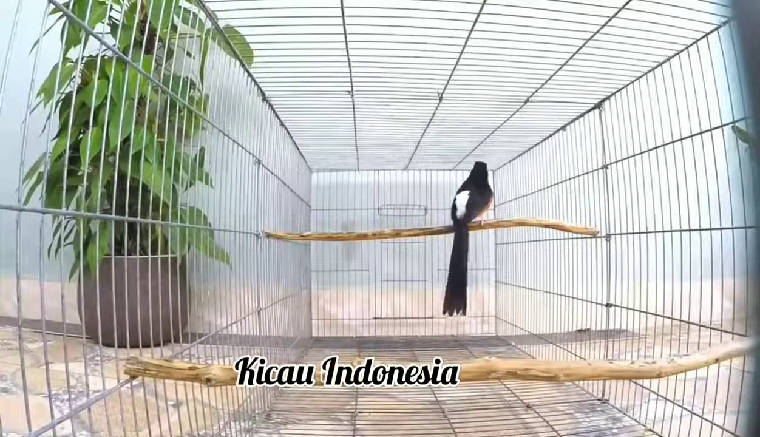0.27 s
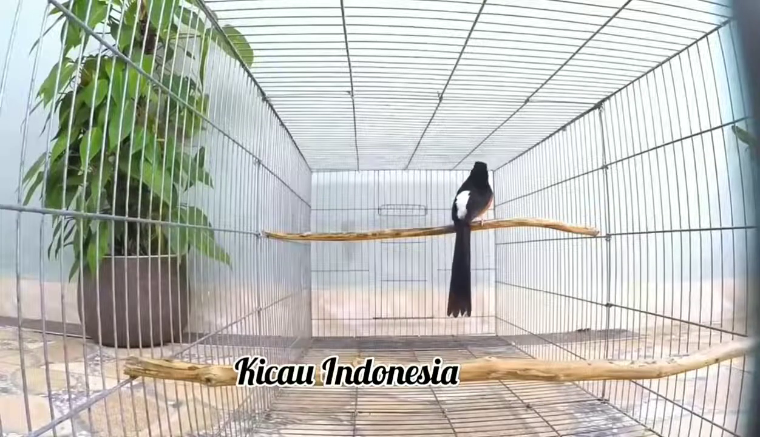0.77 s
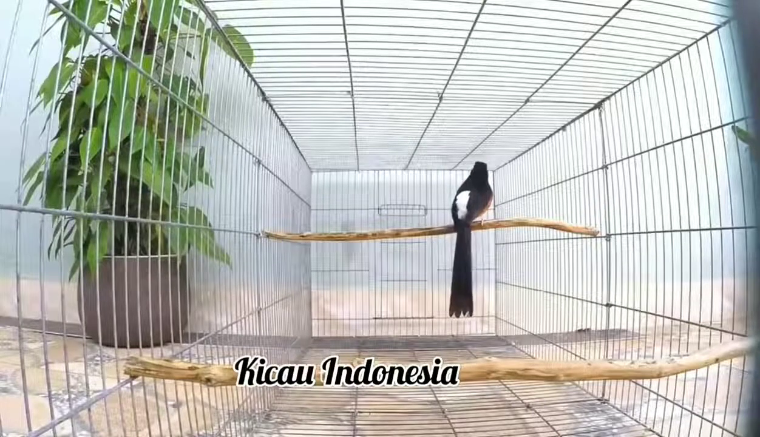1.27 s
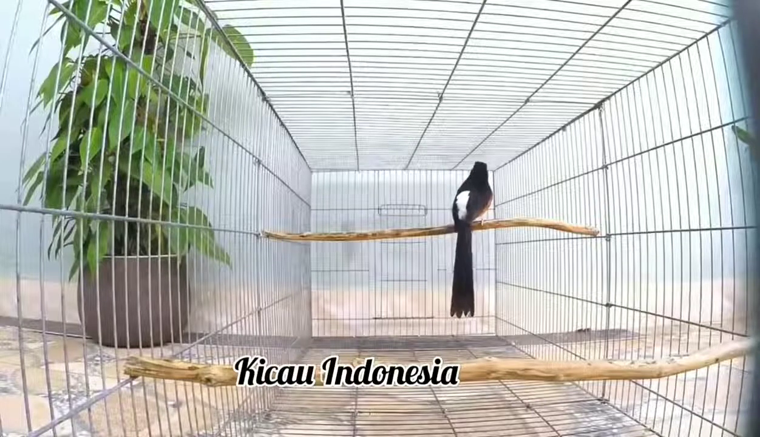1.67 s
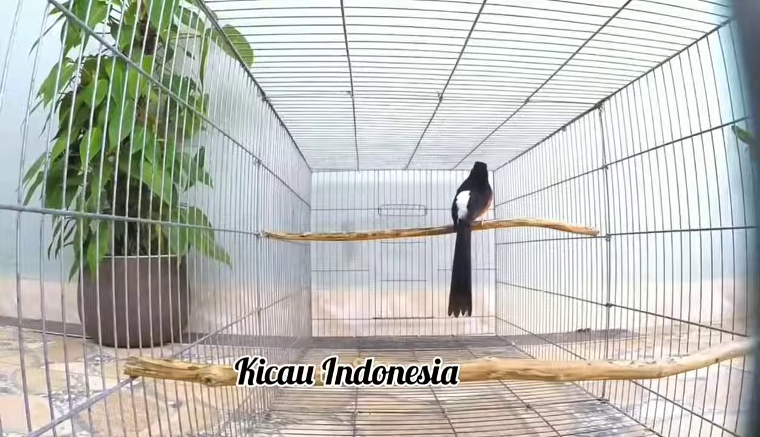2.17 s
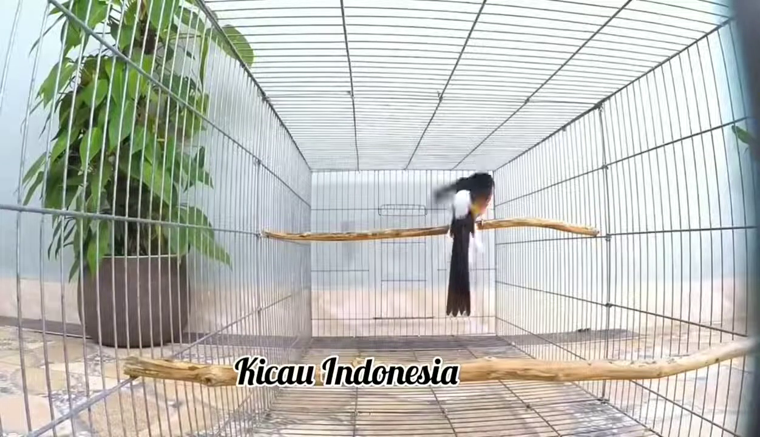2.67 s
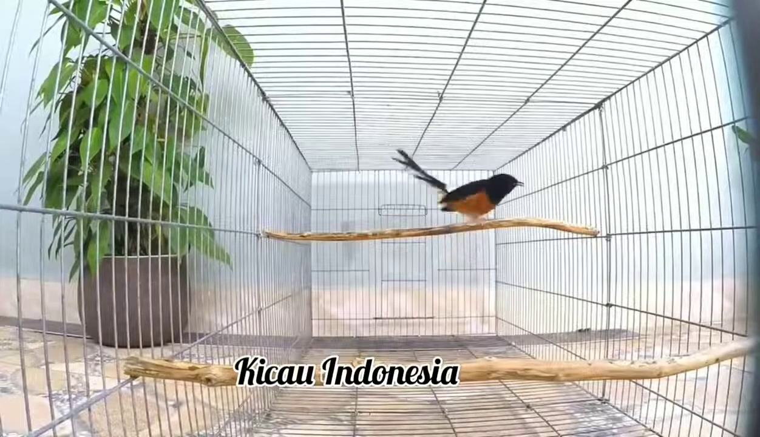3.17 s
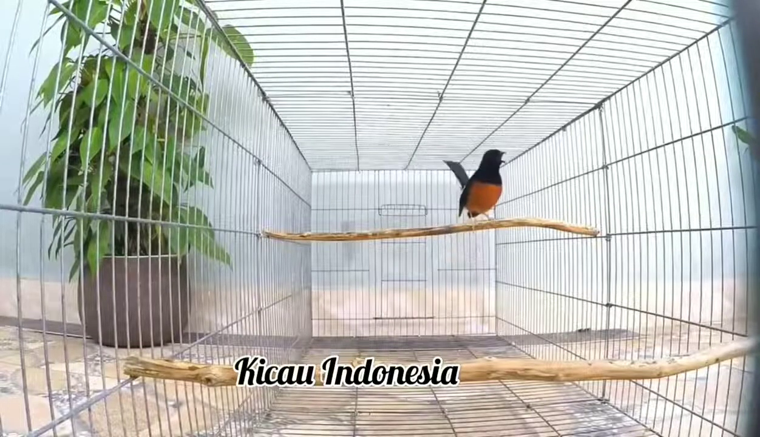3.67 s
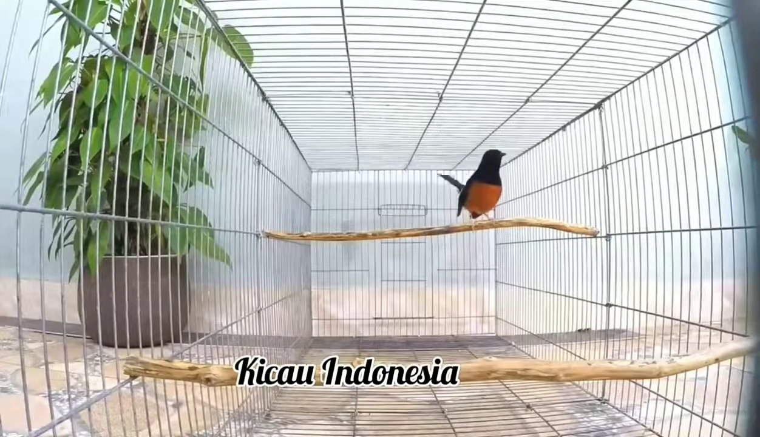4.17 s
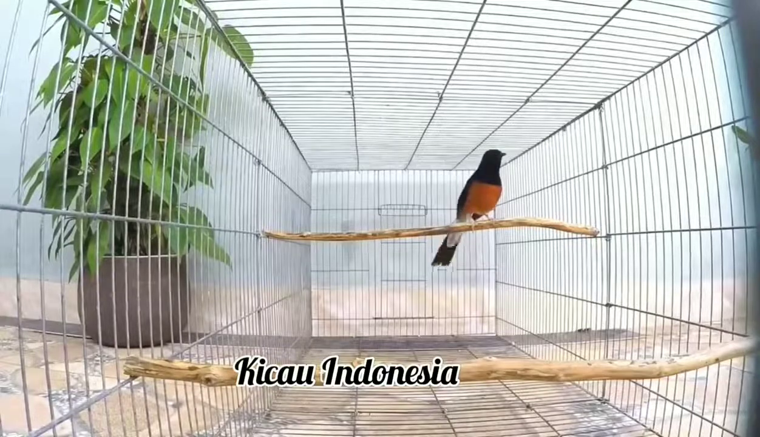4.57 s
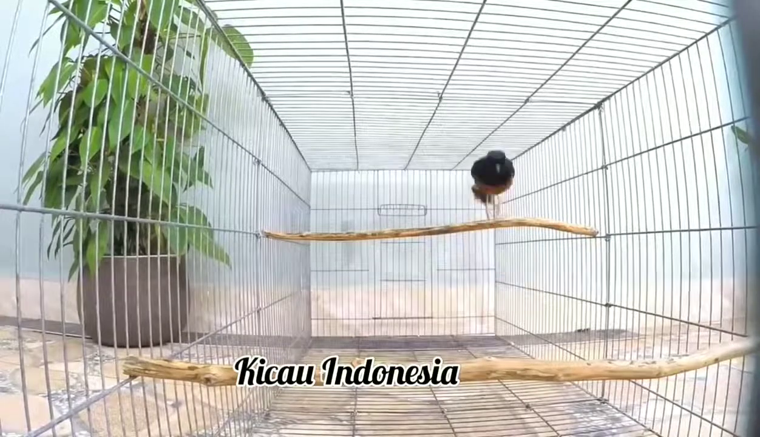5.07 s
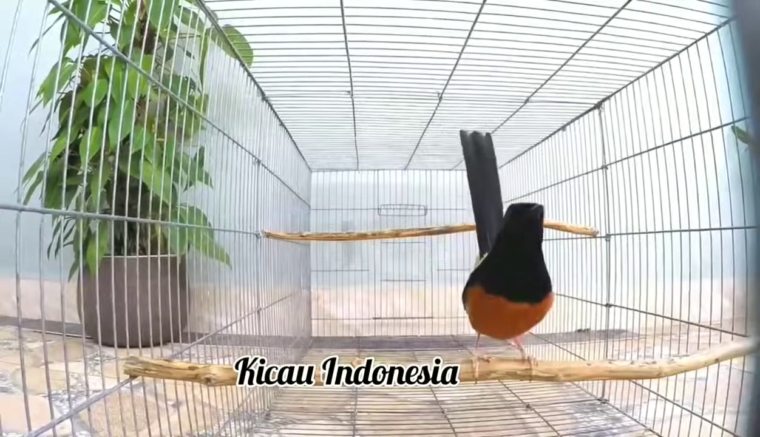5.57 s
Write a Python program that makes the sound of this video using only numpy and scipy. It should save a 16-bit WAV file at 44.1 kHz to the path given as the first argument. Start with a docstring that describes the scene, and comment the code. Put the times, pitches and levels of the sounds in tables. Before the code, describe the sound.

A songbird in a cage sings very close to the microphone in a lively room, its loudest notes slightly flattened. Two rising whistles lead to warbling churrs and low beating trills. Soft rising slurs and dry clicks follow, then a steep falling whistle, faint twitters, feather rustle, a low cage shudder on landing, a quick click rattle and a bright pipe. Distant motorbike and traffic rumble underneath.

```python
"""Rising whistles, churrs and low trills, then soft slurs, dry clicks, one steep falling whistle and a pipe.
A caged shama sings so near the microphone, in a reverberant room, that its loudest notes are flattened.
Each syllable is a gliding, warbling tone; clicks and feather rustles are shaped noise, and so is the
shudder of the cage on landing. Underneath, far off: a motorbike built from engine harmonics, noise-made
traffic, and a faint steady hiss."""
import sys
import numpy as np
from scipy import signal
from scipy.fft import rfft, irfft, next_fast_len
from scipy.io import wavfile
from scipy.ndimage import uniform_filter1d, map_coordinates

SR = 44100
rng = np.random.default_rng(int(sys.argv[2]) if len(sys.argv) > 2 else 0)


def output_pcm(signal):
    """Save a mono or channel-first signal as 16-bit PCM at the path in sys.argv[1].

    Samples are clipped to [-1, 1] before scaling.
    """
    pcm = np.clip(np.atleast_2d(signal).T, -1, 1) * 32767
    wavfile.write(sys.argv[1], SR, np.round(pcm).astype(np.int16))


N = 256220  # length in samples

# clean rising whistles: t/s, length/s, first f/Hz, top f/Hz, level/dB
RISING_WHISTLES = [(0.049, .092, 1096, 2496, 1.5), (0.219, .130, 1007, 2584, 0.9)]
# warbled churrs: t/s of the low point, sinking/s, climbing/s, holding/s, low f/Hz, top f/Hz,
# low level/dB, top level/dB, warble rate at the top/Hz, warble depth at the top/Hz
CHURR_PHRASES = [(.447, .010, .115, 0.025, 1506, 2358, -6.5, -3.5, 64, 492),
                 (.632, 0.035, 0.079, 0.029, 1630, 2546, -10, -2.5, 73, 330),
                 (.850, .022, .143, .041, 1558, 2680, -10.5, -4, 110, 190),
                 (1.101, .060, .104, .034, 1680, 3172, -12, -2, 105, 320)]
SINK_HZ_PER_S, CLIMB_POWER = 11000, 1.35
LOW_WARBLE_DEPTH_HZ, LOW_WARBLE_RATE_HZ = 226, 74  # at a churr's low point
# slow trills: t/s, length/s, first f/Hz, last f/Hz, level/dB, beat rate/Hz, warble depth/Hz
LOW_TRILLS = [(1.364, 0.059, 1676, 1612, -7, 40, 100.6), (1.553, 0.12, 1596, 1630, -10.5, 44, 111.6),
              (1.725, .100, 2259, 2137, -8.5, 37, 181), (1.850, .132, 1247, 1216, -8.5, 38, 92)]
# soft slurs that rise and level off: t/s, length/s, rising/s, first f/Hz, top f/Hz, level/dB
SOFT_SLURS = [(2.169, 0.15, .100, 1960, 2625, -26), (2.556, 0.1, 0.064, 2270, 2900, -25.5),
              (2.868, .165, .075, 2280, 2950, -21), (3.167, .140, 0.06, 2300, 2910, -19)]
# loudness along a slur: share of its length, level/dB
SLUR_LOUDNESS = [(0, -20), (.24, -1.5), (.52, -0.5), (1, -8)]
SLUR_BEND, SLUR_DEPTH_HZ, SLUR_RATE_HZ = 1.3, 139.3, 59  # flattening power of the rise; warble
# short straight tones: pips and twitters, the faint 1.8 kHz echo of an earlier note at the start,
# and a faint steady 2 kHz tone at the end of the falling whistle:
# t/s, length/s, first f/Hz, last f/Hz, level/dB, warble or rasp depth/Hz
STRAIGHT_TONES = [(.005, 0.037, 4170, 4230, -27, 900), (.005, 0.042, 1793, 1860, -31, 30),
                  (.780, .045, 1280, 1110, -29, 60), (1.154, 0.043, 1045, 1076, -24, 76),
                  (1.515, .030, 1538, 1490, -11.5, 6.3), (1.668, 0.028, 2000, 2240, -13.5, 5),
                  (1.705, 0.017, 2170, 2260, -6.5, 5.9), (1.824, 0.012, 2125, 1774, -7, 5),
                  (3.76, 0.023, 8760, 8100, -28.5, 730), (3.891, .140, 2034, 1943, -34, 19),
                  (4.049, 0.1, 6200, 6050, -47.5, 90), (4.123, 0.15, 3510, 2956, -35, 310),
                  (4.263, 0.2, 3040, 3180, -36.5, 180), (4.398, 0.1, 2170, 2330, -34, 250),
                  (4.615, .075, 2190, 2207, -32.5, 250), (4.499, 0.11, 3940, 3950, -44.5, 120),
                  (4.640, 0.2, 3380, 3515, -41, 350), (4.791, 0.016, 4135, 4120, -41, 50),
                  (5.189, 0.14, 3380, 3300, -29, 325), (5.318, 0.064, 3410, 3410, -21.5, 430),
                  (5.575, 0.1, 2916, 2840, -26, 126), (5.69, 0.033, 3100, 3430, -23, 190),
                  (5.722, 0.073, 3526, 3560, -19.5, 123)]
TONE_FLUTTER_HZ = 130
# steep falling whistle: t/s, f/Hz, level/dB
FALLING_WHISTLE = [(3.788, 7470, -15), (3.805, 7240, -23), (3.822, 6050, -19), (3.838, 5290, -15.5),
                   (3.860, 4870, -9.5), (3.878, 4534, -7.5), (3.928, 3630, -4)]
# last piping note, swelling and flicking up: t/s, f/Hz, level/dB
PIPING_NOTE = [(5.643, 1740, -37), (5.665, 1820, -17), (5.680, 1782, -11), (5.694, 1829, .5),
               (5.716, 1860, 2), (5.725, 2040, -8)]
# second, third and fourth harmonic of the voice: level/dB against the fundamental
VOICE_HARMONICS = [-33.5, -39.5, -47]
# colour of the faint high noise on loud notes: f/Hz, level/dB per Hz
SHEEN_COLOUR = [(2500, -12.5), (4000, 5.5), (6500, -6), (8400, -20), (10000, 6), (11500, -2), (16000, -23)]
# clicking calls: t/s, pulses, spacing/s, level of the first pulse/dB
CLICK_TRAINS = [(2.612, 1, 0, -41), (2.88, 2, 0.0079, -15), (3.0508, 2, 0.0078, -13.5),
                (3.240, 2, 0.0038, -14.5), (3.3225, 2, 0.0087, -13), (3.516, 2, .007, -10.5),
                (5.385, 7, .0073, -4.5)]
# colour of the clicks: f/Hz, level/dB per Hz
THROAT_COLOUR = [(240, -44), (400, -12.5), (1040, 2.5), (1760, -0.5), (2880, 3), (3580, 6), (4510, 2),
                 (5270, -0.5), (7510, -9.5), (8240, -16.5), (9920, -15.5), (10900, -23.5), (16000, -27)]
CLICK_FADE_DB_PER_S = 118  # a train weakens as it runs
# feather rustles: t/s, length/s, level/dB
WING_RUSTLES = [(2.693, 0.38, -47), (4.419, 0.092, -46), (4.612, 0.084, -40), (5.162, 0.032, -35.5),
                (5.176, 0.13, -36), (5.283, 0.29, -38)]
# colour of the feathers: f/Hz, level/dB per Hz
FEATHER_COLOUR = [(700, -8), (1500, 3), (3500, 8), (6000, -2), (8000, -13), (11000, -14.5), (15000, -55)]
# colour of the shuddering cage: f/Hz, level/dB per Hz
CAGE_COLOUR = [(20, -1), (42, -26.5), (50, -18), (56, -13.5), (65, 2), (76, -24.5), (130, -21), (300, -68)]
LANDING_S, SHAKE_DB, SHAKE_RISE_S, SHAKE_FADE_DB_PER_S = 5.41, -19, .12, 23.5
# early echoes off near surfaces: delay/s, level/dB
NEAR_ECHOES = [(.0013, -44.5), (.0052, -22), (.0071, -11), (0.0228, -16)]
# reverberation: f/Hz, t60/s
ROOM_T60 = [(500, 0.062), (2000, 0.65), (4000, 0.39), (8000, 0.38), (15000, 0.5)]
# far motorbike engine: t/s, cycle f/Hz
ENGINE_CYCLES = [(0, 24.8), (1.55, 24.5), (2.1, 24.6), (3.0, 25.4), (3.4, 27.2), (5.81, 25.7)]
# its exhaust note: t/s, level/dB
EXHAUST_LEVEL = [(0, -23), (.55, -34), (.9, -27.5), (1.45, -36.5), (1.7, -43), (3.1, -38.5), (5.81, -43)]
# weights of the drone's harmonics: f/Hz, level/dB
DRONE_COLOUR = [(70, -8.5), (100, -7), (120, -4), (140, 2), (168, -6), (200, -19), (290, -18.5), (400, -27)]
# weights of the whine's harmonics: f/Hz, level/dB
WHINE_COLOUR = [(320, 3.5), (400, 0), (485, -7), (560, 6.5), (650, -2), (730, 3.5), (810, 5), (900, -25),
                (1060, -5)]
DRONE_DB, RECEDE_DB_PER_S = -28, 2.5  # the drone fades as it rides off
# traffic swells: t/s of the peak, time from peak to 1/e/s, road noise level/dB, engine whine level/dB
TRAFFIC_SWELLS = [(1.0, 0.29, -42, -49), (2.35, 0.4, -42, -42), (3.4, 0.42, -43, -38.5),
                  (5.05, .2, -39.5, -43.5)]
# colour of the far rumble: f/Hz, level/dB per Hz
RUMBLE_COLOUR = [(15, 2.5), (28, 9), (70, 7), (100, 3.5), (150, 2.5), (200, -5.5), (300, -12.5), (500, -44)]
# colour of the road noise: f/Hz, level/dB per Hz
ROAD_COLOUR = [(130, -47.5), (220, -2.5), (292, -7), (360, -4.5), (393, -6.5), (481, -8), (569, -5),
               (823, -8.5), (999, -10.5), (1800, -14.5), (2340, -28), (3960, -120)]
# colour of the steady hiss: f/Hz, level/dB per Hz
HISS_COLOUR = [(600, -43), (1000, -40), (2000, -7), (3200, -4), (4500, -10), (6500, -20.5), (9000, -26),
               (12000, -40), (16000, -52)]
TOP_HZ = 16000  # band limit


def amp(db):
    """Decibels to gain."""
    return 10 ** (np.asarray(db) / 20)


def unit(x):
    """x at rms 1."""
    return x / np.sqrt(np.mean(x ** 2) + 1e-20)


def along(points, hz):
    """Read (f/Hz, value) points at hz, on a log frequency axis."""
    f, v = np.transpose(points)
    return np.interp(np.log(hz + 1), np.log(f + 1), v)


def curves(rows, t):
    """Each column after the first, read at the positions t."""
    s, *cols = np.transpose(rows)
    return [np.interp(t, s, c) for c in cols]


def wobble(rate, size):
    """A smooth random curve with rate knots a second."""
    knots = rng.standard_normal(int(N * rate / SR) + 4)
    return map_coordinates(knots, [np.arange(size) * rate / SR])


def filtered(x, response):
    """x times a response of frequency, padded so that its end does not wrap round."""
    m = next_fast_len(N + SR // 2)
    return irfft(rfft(x, m) * response(np.fft.rfftfreq(m, 1 / SR)), m)[:N]


def noise(spectrum):
    """Coloured noise of rms 1."""
    return unit(filtered(rng.standard_normal(N), lambda hz: amp(along(spectrum, hz))))


def add(track, s, x):
    """Mix x into the track from time s on."""
    part = track[max(round(s * SR), 0):][:len(x)]
    part += x[:len(part)]


def progress(length):
    """0 to 1 over a length in seconds, one value per sample."""
    return np.linspace(0, 1, max(int(length * SR), 8))


def arch(u, droop_db):
    """A level in dB that is 0 in the middle of a note and droops toward both ends."""
    return -droop_db * (2 * u - 1) ** 2


def song(sheen_db=-38):
    """All tonal sounds of the song; faint high noise follows their loudness."""
    voice = np.zeros(N)
    syllables = [*upsweeps(), *churrs(), *trills(), *slurs(), *short_tones()]
    syllables += [whistle(FALLING_WHISTLE), whistle(PIPING_NOTE)]
    for s, sound in syllables:
        add(voice, s, sound)
    loudness = uniform_filter1d(np.abs(voice), size=128)
    return voice + amp(sheen_db) * loudness * noise(SHEEN_COLOUR)


def note(s, pitch, db, depth=0, rate=60, pulse_db=0, edge=.005, jitter=0.005, flutter_db=1.5,
         unsteady=0.0514, skew=0.47, beat_db=3.5, rough=0.38, soft_db=-11, rasp_rate=800):
    """One syllable: a nearly pure tone whose pitch glides and warbles as the syrinx muscles pull."""
    # hold the end values for edge seconds either side
    settings = np.broadcast_arrays(pitch, db, depth, rate)
    pitch, db, depth, rate = (np.pad(c, int(edge * SR), mode="edge") for c in settings)
    size = len(pitch)
    t = np.arange(size) / SR
    uneven_rate = rate * (1 + unsteady * wobble(70.4, size))
    turn = 2 * np.pi * (np.cumsum(uneven_rate) / SR - rate[0] * edge)

    # a slow warble flicks up quickly and softly, then slides down loudly, as a separate beat
    slow = np.interp(rate, [50, 70], [1, 0])
    warble = np.cos(turn) - slow * skew * np.sin(2 * turn)
    beat_size_db = np.maximum(slow * beat_db * np.clip(depth / 100, 0, 1), pulse_db)
    beats = beat_size_db * np.sin(turn)

    # fast warbles are partly irregular, and softly blown ones break up into a rasp
    rasp = np.clip((1 - slow) * (rough + np.maximum(soft_db - db, 0) / 10), 0, 1)
    swing = np.sqrt(1 - rasp ** 2) * warble + rasp * np.tanh(wobble(rasp_rate, size))
    hz = (pitch + depth * swing) * (1 + jitter * wobble(299.6, size))

    phase = 2 * np.pi * np.cumsum(hz) / SR
    tone = np.sin(phase)
    for k, level in enumerate(VOICE_HARMONICS, 2):
        tone = tone + amp(level) * np.sin(k * phase) * (k * hz < SR / 2)
    from_ends = np.minimum(t, t[-1] - t)
    gate = np.sin(np.pi / 2 * np.clip(from_ends / (1.21 * edge), 0, 1)) ** 2
    return s - edge, tone * gate * amp(db + beats + flutter_db * wobble(124, size))


def upsweeps(rise_share=.88, attack_share=0.29, attack_db=26, swell_db=4, sag_db=3.5, sag_share=0.72,
             sag_width=0.13):
    """Each whistle starts quickly, climbs evenly and grows, sags a little on the way and holds its top."""
    for s, length, first_hz, top_hz, db in RISING_WHISTLES:
        u = progress(length)
        pitch = np.interp(u, [0, rise_share], [first_hz, top_hz])
        attack = attack_db * np.maximum(1 - u / attack_share, 0) ** 2.02
        sag = sag_db * np.exp(-((u - sag_share) / sag_width) ** 2)
        yield note(s, pitch, db - swell_db * (1 - u) - attack - sag)


def churrs(swell_power=1.914, pulse_db=1.7):
    """One effort raises pitch and level together and changes the speed and width of the warble."""
    for (s, sink, climb, hold, low_hz, top_hz, low_db, top_db,
         top_rate, top_depth) in CHURR_PHRASES:
        length = sink + climb + hold
        t = progress(length) * length - sink  # 0 at the low point
        sinking = np.maximum(-t, 0) * SINK_HZ_PER_S / (top_hz - low_hz)
        effort = np.clip(t / climb, 0, 1) ** CLIMB_POWER + sinking
        swell = effort ** swell_power
        pitch = low_hz + (top_hz - low_hz) * effort
        db = low_db + (top_db - low_db) * swell
        depth = LOW_WARBLE_DEPTH_HZ + (top_depth - LOW_WARBLE_DEPTH_HZ) * swell ** 2
        rate = LOW_WARBLE_RATE_HZ + (top_rate - LOW_WARBLE_RATE_HZ) * swell
        yield note(s - sink, pitch, db, depth, rate, pulse_db)


def trills(droop_db=4):
    """Slow warbles, heard as separate beats on a nearly level pitch."""
    for s, length, first_hz, last_hz, db, rate, depth in LOW_TRILLS:
        u = progress(length)
        yield note(s, first_hz + (last_hz - first_hz) * u, db + arch(u, droop_db), depth, rate)


def slurs():
    """Quiet calls that rise to a ceiling and warble just below it, most where they are loudest."""
    for s, length, rise, first_hz, top_hz, db in SOFT_SLURS:
        u = progress(length)
        shape_db, = curves(SLUR_LOUDNESS, u)
        still_to_rise = np.maximum(1 - u * length / rise, 0) ** SLUR_BEND
        ceiling = top_hz - (top_hz - first_hz) * still_to_rise
        depth = SLUR_DEPTH_HZ * amp(shape_db)
        yield note(s, ceiling - depth, db + shape_db, depth, SLUR_RATE_HZ)


def short_tones(droop_db=6):
    """Short straight glides: the loud ones pure, the soft ones roughened as far as their depth allows."""
    for s, length, first_hz, last_hz, db, depth in STRAIGHT_TONES:
        u = progress(length)
        pitch = first_hz + (last_hz - first_hz) * u
        yield note(s, pitch, db + arch(u, droop_db), depth, TONE_FLUTTER_HZ)


def whistle(contour):
    """A pure note along its own pitch and level."""
    start, end = contour[0][0], contour[-1][0]
    return note(start, *curves(contour, np.arange(start, end, 1 / SR)))


def clicks(t60=0.024, attack=0.00029):
    """Dry calls: trains of broad pulses, each ringing briefly in the throat."""
    t = np.arange(SR // 20) / SR
    envelope = np.zeros(N)
    for s, count, spacing, db in CLICK_TRAINS:
        for delay in spacing * np.arange(round(count)):
            decay = amp(db - CLICK_FADE_DB_PER_S * delay - 60 * t / t60)
            add(envelope, s + delay, decay * (1 - np.exp(-t / attack)))
    return envelope * noise(THROAT_COLOUR)


def feathers(grain_db=3):
    """Wings and tail swish, as grainy noise, while the bird shifts and flies forward."""
    envelope = np.zeros(N)
    for s, length, db in WING_RUSTLES:
        add(envelope, s, amp(db) * signal.windows.tukey(max(int(length * SR), 8), .5))
    return envelope * unit(noise(FEATHER_COLOUR) * amp(grain_db * wobble(150, N)))


def cage():
    """The landing sets the cage floor shuddering: low noise that rises into it, then dies away."""
    t = np.arange(N) / SR - LANDING_S
    rise = np.clip(1 + t / SHAKE_RISE_S, 0, 1)
    return rise * amp(SHAKE_DB - SHAKE_FADE_DB_PER_S * np.maximum(t, 0)) * noise(CAGE_COLOUR)


def room(x, tail_db=-6, onset=0.0048):
    """Near surfaces echo first; a diffuse tail builds up and dies at its own speed in each band."""
    hz, t, z = signal.stft(rng.standard_normal(SR * 3 // 4), SR, nperseg=256)
    decay = amp(-60 * t / along(ROOM_T60, hz)[:, None])
    tail = signal.istft(z * decay * (1 - np.exp(-t / onset)), SR, nperseg=256)[1]
    response = amp(tail_db) * tail / np.linalg.norm(tail)
    for delay, db in NEAR_ECHOES:
        add(response, delay, amp([db]))
    return signal.fftconvolve(x, response)[:N]


def motorbike(waver_db=1.0):
    """Harmonics of a far engine's cycle, each wavering on its way; every third one whines higher up."""
    t = np.arange(N) / SR
    rate, = curves(ENGINE_CYCLES, t)
    exhaust_db, = curves(EXHAUST_LEVEL, t)
    _, whine_gain = traffic_swells()
    phase = 2 * np.pi * np.cumsum(rate) / SR

    def line(k):
        """The k-th harmonic of the engine cycle, wavering in level."""
        return np.sin(k * phase + rng.uniform(0, 2 * np.pi)) * amp(waver_db * wobble(4.15, N))

    def stack(orders, colour):
        """Harmonics weighted by a spectrum, at rms 1."""
        return unit(sum(line(k) * amp(along(colour, k * rate)) for k in orders))

    exhaust = amp(exhaust_db) * unit(line(2))
    drone = amp(DRONE_DB - RECEDE_DB_PER_S * t) * stack(range(3, 13), DRONE_COLOUR)
    whine = whine_gain * stack(range(12, 40, 3), WHINE_COLOUR)
    return exhaust + drone + whine


def traffic_swells():
    """Gains of the road noise and of the engine whine as traffic comes and goes."""
    t = np.arange(N) / SR
    gains = np.zeros((2, N))
    for s, width, road_db, whine_db in TRAFFIC_SWELLS:
        gains += amp([[road_db], [whine_db]]) * np.exp(-((t - s) / width) ** 2)
    return gains


def background(hiss_db=-50, rumble_db=-35, road_db=-47):
    """Far traffic: deep rumble and swelling road noise, with a faint steady hiss."""
    swell, _ = traffic_swells()
    rumble = amp(rumble_db) * noise(RUMBLE_COLOUR)
    road = np.hypot(amp(road_db), swell) * noise(ROAD_COLOUR)
    return rumble + road + amp(hiss_db) * noise(HISS_COLOUR)


def scene(near_db=-7):
    """On the front perch the bird is closer, so less of the room is heard with it."""
    bird = song() + clicks() + feathers()
    wet_db = np.interp(np.arange(N) / SR, [5.1, 5.3], [0, near_db])
    return bird + room(bird * amp(wet_db)) + cage() + motorbike() + background()


def record(dry, top=0.94):
    """The microphone's input stage flattens the loudest peaks; nothing passes above the band limit."""
    hardness = 16  # higher turns the knee sharper
    clipped = dry / (1 + np.abs(dry / top) ** hardness) ** (1 / hardness)
    return filtered(clipped, lambda hz: hz < TOP_HZ)


dry = scene()
out = record(dry)
output_pcm(out)
```